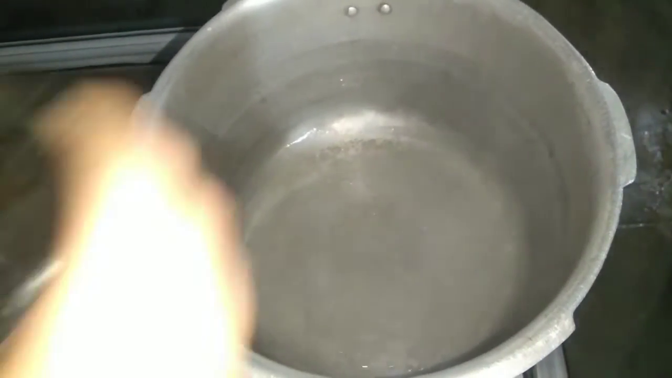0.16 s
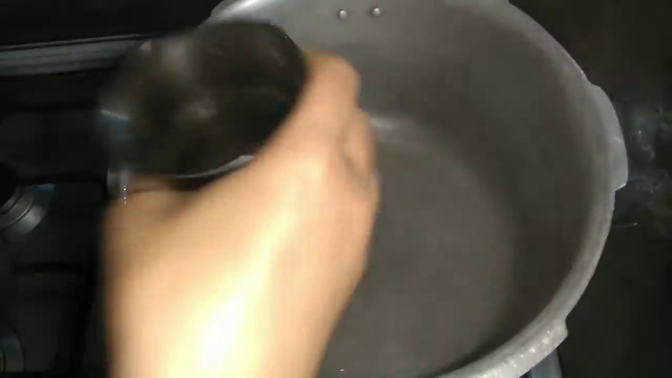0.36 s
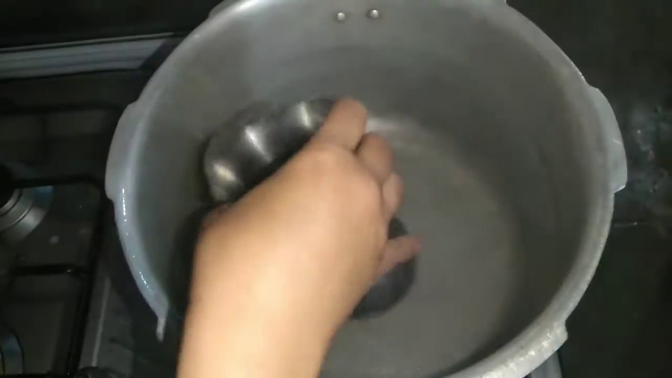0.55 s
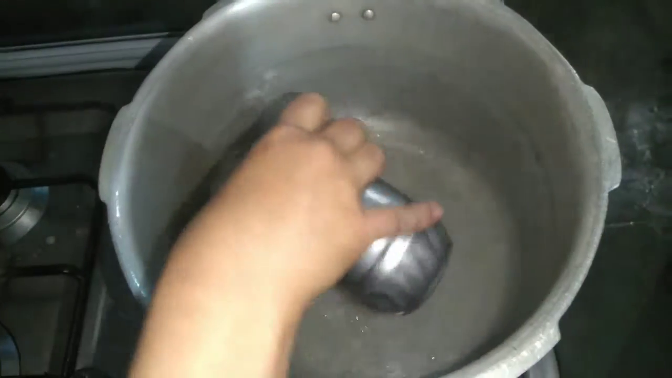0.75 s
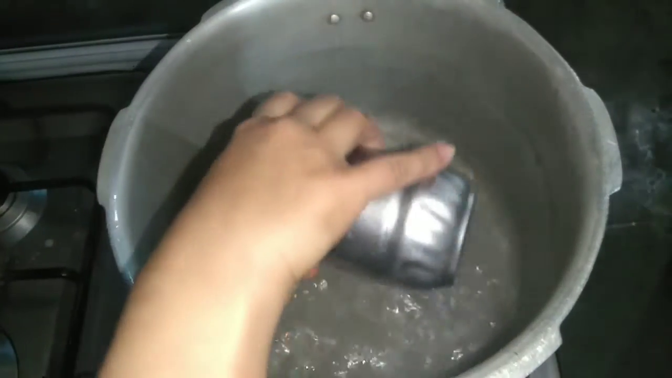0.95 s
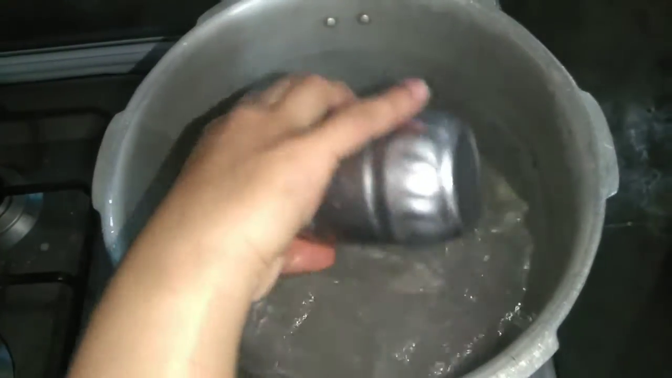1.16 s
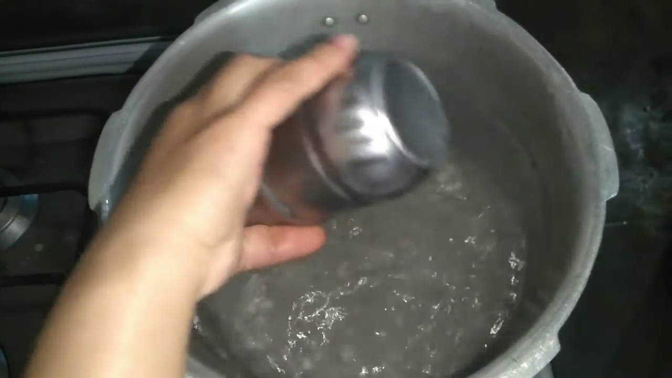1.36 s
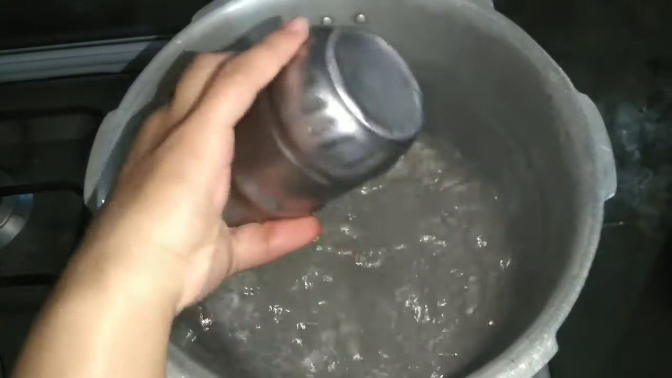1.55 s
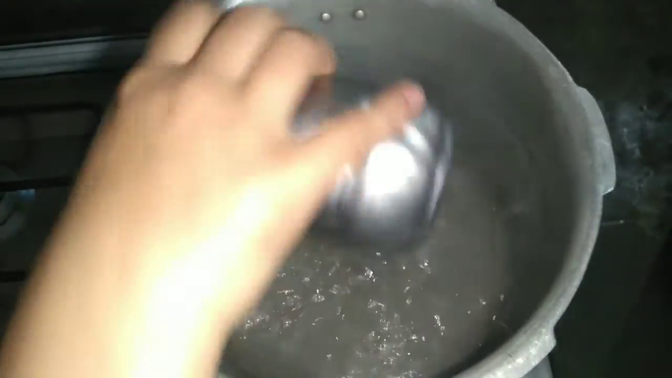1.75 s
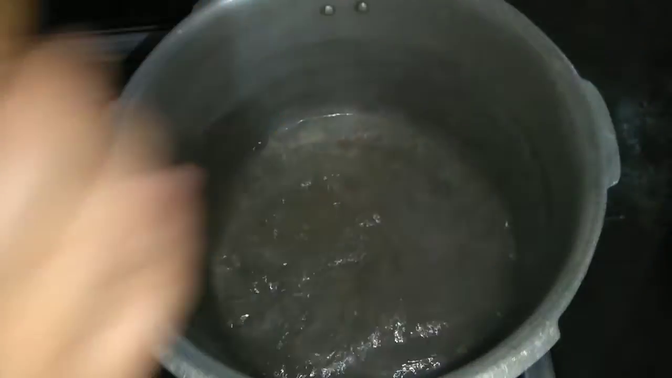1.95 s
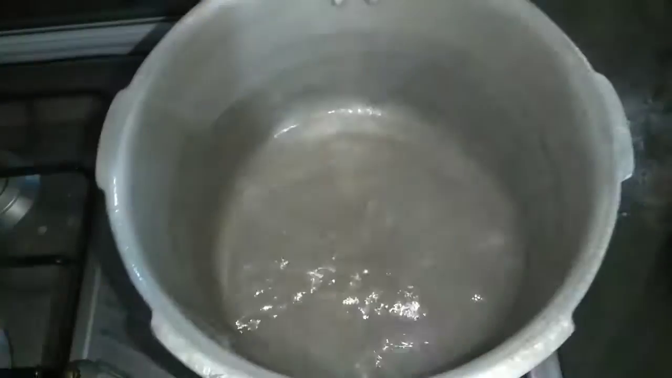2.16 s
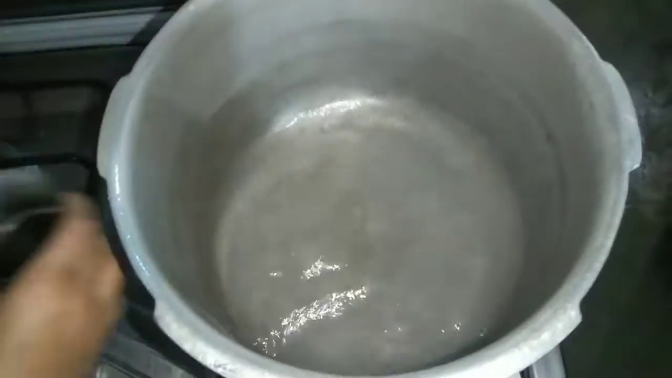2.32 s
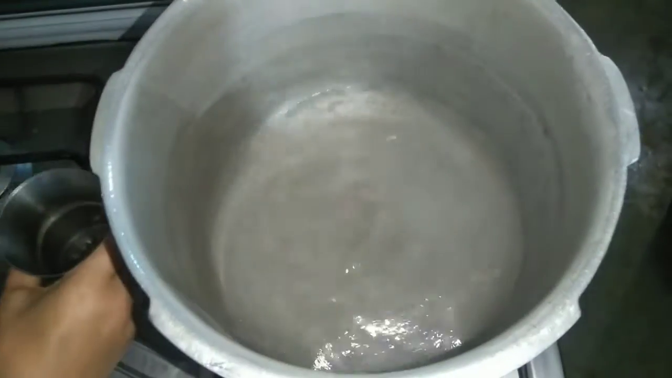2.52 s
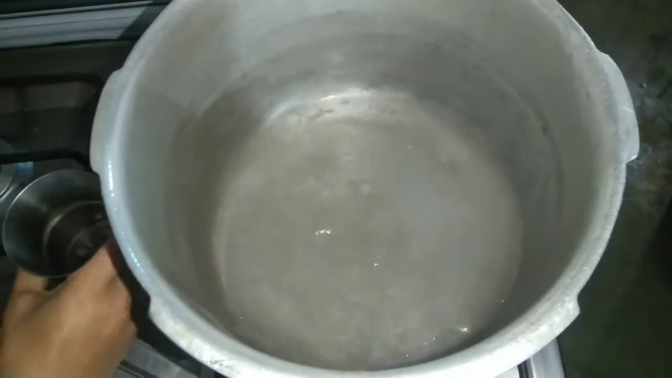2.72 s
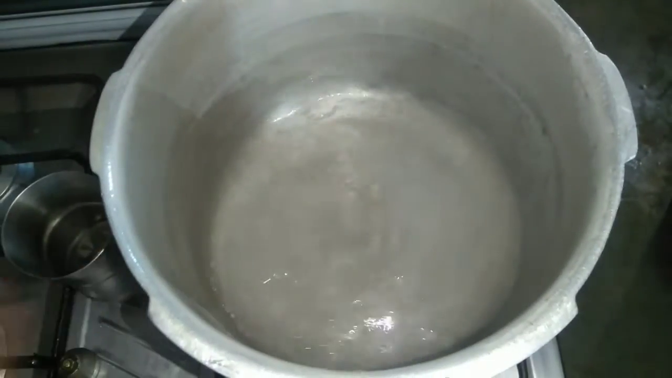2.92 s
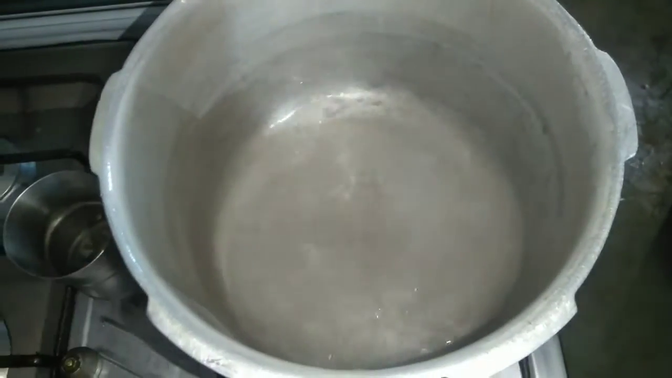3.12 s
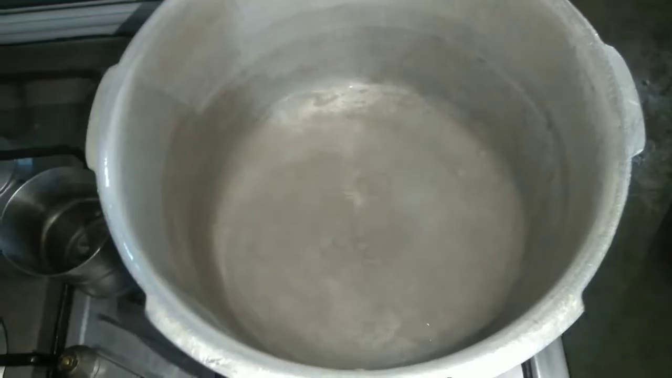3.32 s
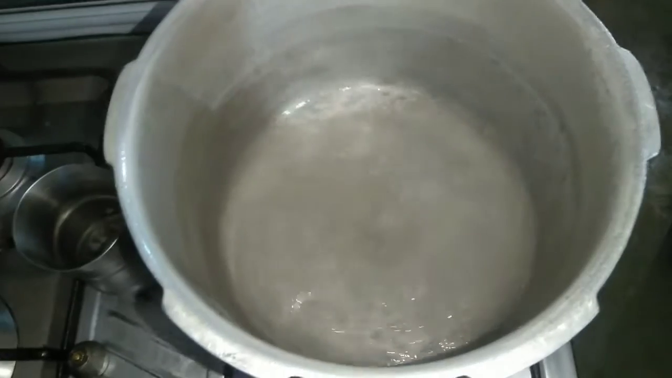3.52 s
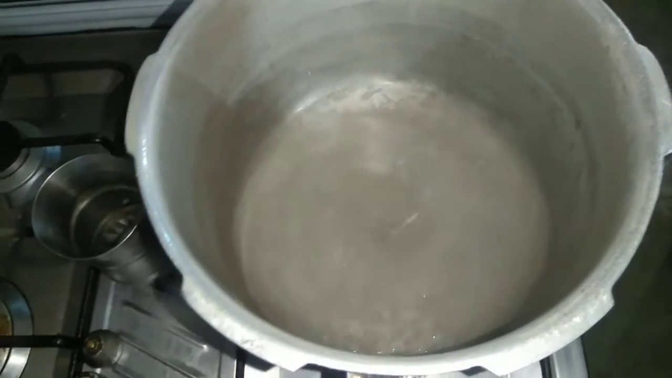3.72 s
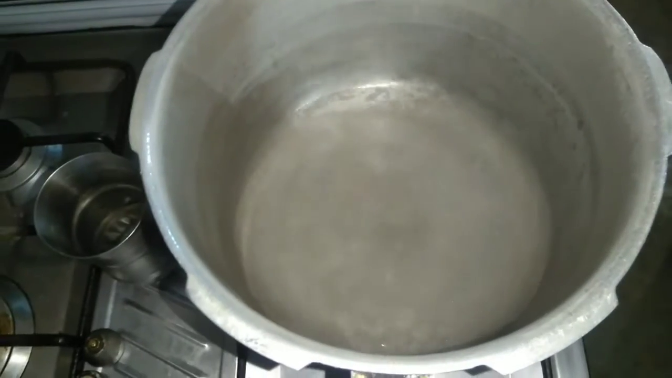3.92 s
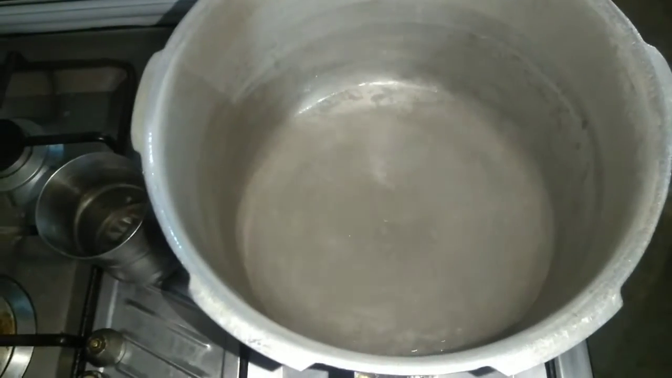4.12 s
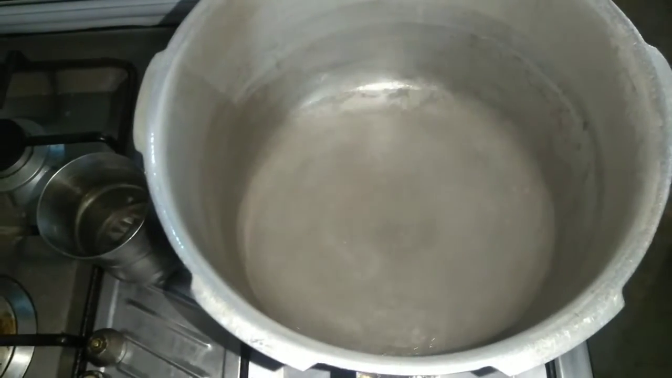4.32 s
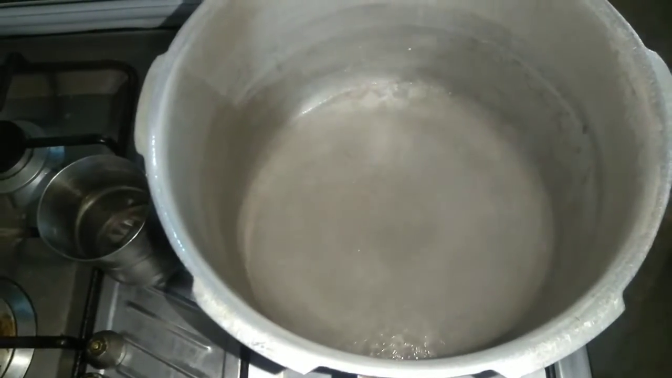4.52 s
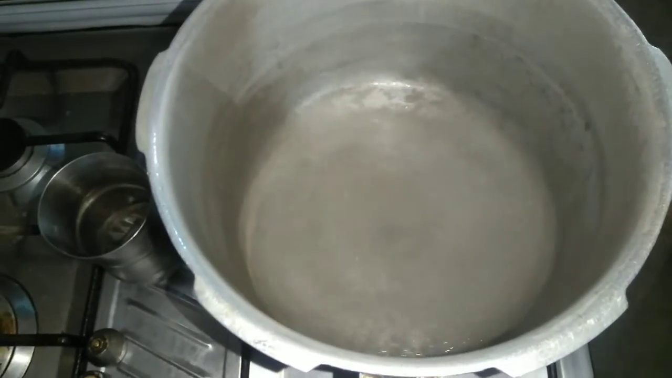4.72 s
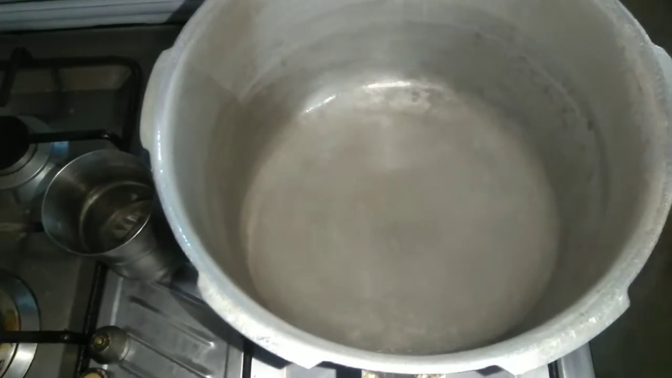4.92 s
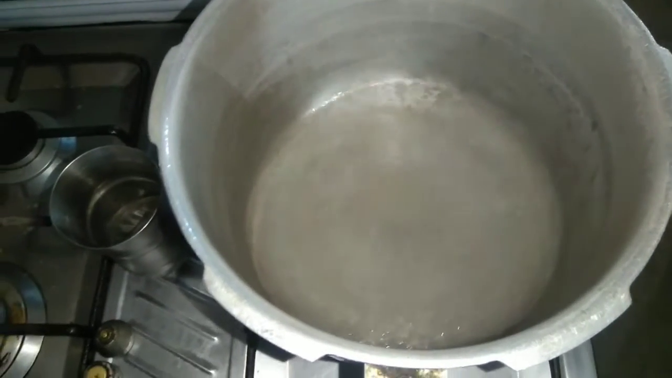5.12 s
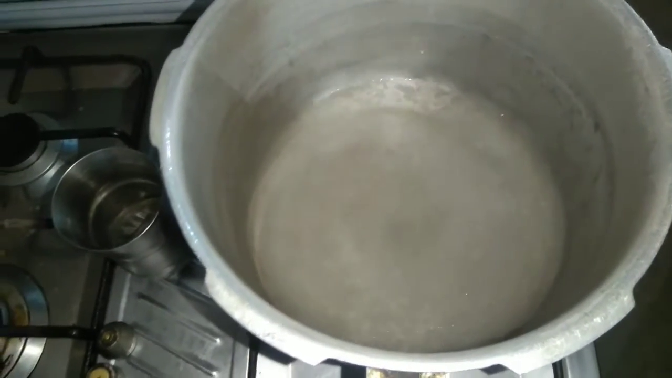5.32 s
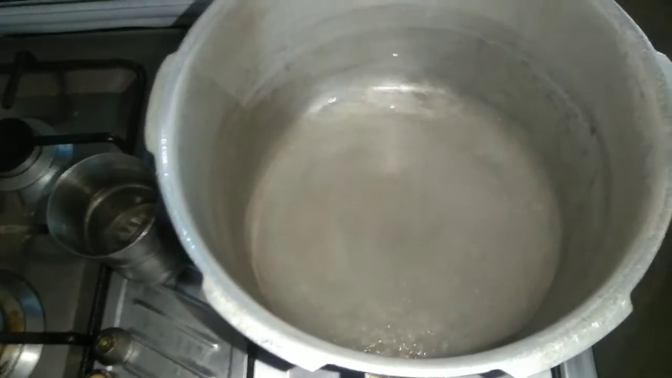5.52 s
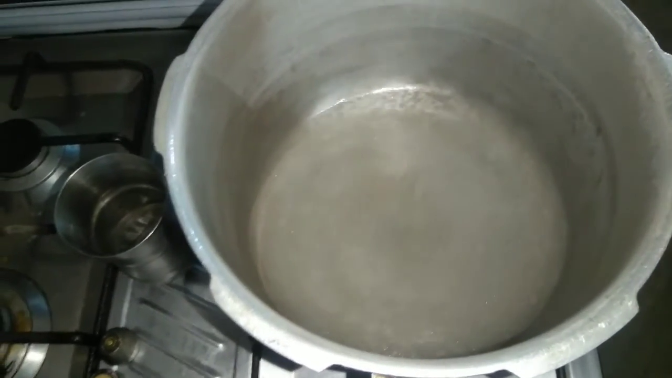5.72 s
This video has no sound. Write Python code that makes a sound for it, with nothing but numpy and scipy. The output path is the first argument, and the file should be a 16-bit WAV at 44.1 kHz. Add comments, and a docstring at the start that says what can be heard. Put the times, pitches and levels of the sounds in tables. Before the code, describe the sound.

A cup of water is splashed into a big metal pot, gurgles and fizzes out, then the cup thuds down and close knocks follow.

```python
"""On a kitchen stove, a steel cup of water is tipped into a big metal pot: splash, gurgle, then a dying fizz.
The water is made of thousands of ringing bubbles, with slaps and gulps, coloured by the pot.
The cup lands with a thud made of rebounding contacts, and filtered noise makes the stove shudder.
Knocks ring a hard case; rough noise makes scuffs and squeaks, and single clicks make bright ticks.
Room tone lies beneath, and a noise gate turns down the pauses."""
import sys
import numpy as np
from scipy import signal
from scipy.fft import rfft, irfft
from scipy.io import wavfile
from scipy.ndimage import uniform_filter1d, map_coordinates

SR = 44100
rng = np.random.default_rng(int(sys.argv[2]) if len(sys.argv) > 2 else 0)


def unload_audio(sound):
    """Save the sound as a 16-bit wav file, at the path given as the first command line argument."""
    columns = np.transpose(np.atleast_2d(sound))
    # keep every value between -1 and 1, then stretch to whole-number steps
    steps = np.round(np.clip(columns, -1, 1) * 32767)
    wavfile.write(sys.argv[1], SR, steps.astype(np.int16))


N = 254456
TIME = np.arange(N) / SR

# Vigour of the pour and of the foam it leaves. Each row: time in seconds, relative level in dB.
POUR_VIGOUR = [(0.68, -58), (0.702, -38.5), (0.725, -32.5), (0.967, -22), (1.114, -31), (1.164, -30.5),
               (1.226, -23.5), (1.302, -22), (1.43, -30), (1.82, -32.5), (1.914, -38.5), (2.356, -44.5),
               (2.5, -54.5), (2.628, -71), (2.66, -94)]
# Colour of the water. Each row: frequency in Hz, relative level in dB per Hz.
WATER_COLOUR = [(110, -36), (180, -9), (213, -9), (339, -25), (387, 0), (466, -14), (652, -14.5),
                (946, -10.5), (1160, -8), (2450, -4), (2690, -5.5), (3550, -4.5), (6570, -5.5), (11500, 2),
                (15500, -5.5)]
# Air and wall resonances of the pot. Each row: frequency in Hz, width in Hz, level in dB.
POT_RESONANCES = [(214, 25, -4.5), (391.8, 7.1, 5.5), (933, 56, 8), (1414, 120, -1.5), (2350, 500, -6),
                  (2980, 90, 1.5)]
# Bubble sizes, largest first. Each row: bubbles tried per second, lowest pitch in Hz, highest pitch in Hz,
# cycles rung, size spread in dB, share by which the pitch climbs, phase spread between channels in radians.
BUBBLE_SIZES = [(352, 170, 590, 38, 1.5, 0.13, 0.57), (380, 600, 1700, 24, 1.2, 0.15, 0.91),
                (1700, 1737, 4230, 85, .8, 0.15, 3.3), (2000, 4300, 7600, 70, 1.2, 0.06, 3.2),
                (3500, 7230, 15800, 50, 1.2, .03, 1.8)]
# How each bubble size answers the pour, largest first. Each row: dB at full vigour,
# share of the vigour's swing, late start in seconds, dB lost without the stream.
BUBBLE_RESPONSE = [(-44, 0.66, 0.05, 16.5), (-38, 0.3, 0.04, 28.5), (-28.5, 1.056, -0.043, 10.5),
                   (-28, 1.16, -.04, 2.5), (-23.5, 1, 0.0038, -0.5)]
# Bubbles bursting at the surface: one row with the same four columns, level relative.
BURST_RESPONSE = (-13.5, 0.6, 1.5, 4)
# The stream drumming the stove through the pot's base: one row with the same four columns.
DRUM_RESPONSE = (-52.5, 0.3, 0.12, 24)
# Sloshes that shed a cloud of bubbles around one pitch.
# Each row: crest in seconds, length in seconds, pitch in Hz, boost in dB.
SLOSH_CLOUDS = [(0.736, 0.041, 3000, -6), (1.053, 0.094, 444, 11.5), (1.667, 0.042, 432, 16.5),
                (1.748, 0.052, 2320, 7.5), (1.88, 0.091, 250, 6), (2.062, 0.11, 910, 15),
                (2.29, 0.13, 2810, 3), (2.37, 0.068, 815, 19.5)]
# Single big bubbles, and short spells of the pot ringing near 950 Hz. Each row: start in seconds, pitch in Hz,
# # relative level in dB, time to fall 60 dB in seconds, share by which the pitch climbs.
BIG_BUBBLES = [(0.699, 3650, -27.5, 0.077, 0.12), (0.723, 1926, -29, 0.07, .15),
               (0.75, 1613, -23, 0.074, 0.47), (0.755, 1435, -18, 0.055, .15),
               (0.787, 2044, -21.5, 0.078, 0.24), (0.803, 1295, -30, 0.056, 0.42),
               (0.826, 3030, -21, 0.037, 0.28), (0.841, 2480, -22, 0.028, 0.24),
               (0.868, 1230, -27.5, 0.028, .3), (0.913, 3560, -18, 0.059, 0.13),
               (0.947, 910, -23, 0.066, 0.1), (0.97, 950, -26, 0.054, .15), (0.994, 954, -25, 0.093, 0.15),
               (1.024, 915, -25, 0.055, .15), (1.014, 2030, -20, 0.092, 0.56),
               (1.061, 2340, -20, 0.061, 0.27), (1.103, 574, -24.5, 0.028, .2),
               (1.188, 2370, -22.5, 0.079, .2), (1.214, 957, -29, .1, 0.083),
               (1.255, 3290, -17.5, 0.03, 0.33), (1.288, 2230, -19.5, 0.073, 0.29),
               (1.31, 3260, -19, 0.071, .25), (1.343, 2410, -20.5, .06, 0.29),
               (1.409, 1400, -23, 0.066, 0.26), (1.441, 1700, -22, 0.053, .3),
               (1.459, 2010, -20.5, 0.04, 0.26), (1.523, 774, -19.5, 0.067, .22),
               (1.527, 890, -22, .035, .2), (1.529, 1951, -18, 0.032, 0.24),
               (1.53, 2400, -17.5, 0.043, 0.17), (1.578, 2820, -22, 0.037, 0.26),
               (1.585, 1450, -25, 0.06, .4), (1.617, 2000, -22.5, .048, 0.33),
               (1.656, 2400, -38, .04, 0.27), (1.69, 1620, -28, .035, .4), (1.696, 706, -31, 0.084, 0.31),
               (1.721, 2600, -31, 0.032, 0.35), (1.742, 2450, -33, 0.057, 0.22),
               (1.76, 3830, -19, .05, 0.16)]
# Lumps of water slapping the pot. Each row: start in seconds, relative level in dB, lowest Hz, contact Hz,
# left-right difference in dB, resonance in Hz, chatter in dB against the first contact.
WATER_SLAPS = [(0.699, -10, 2780, 5000, -3, 3010, 8), (0.7275, 6, 3517, 3926, 4.5, 3840, 2),
               (0.757, 1.5, 1430, 2200, 6, 1550, 4), (1.533, -9, 1200, 2574, 3.5, 2400, 14)]
# Water lapping the wall. Each row: start in seconds, length in seconds, pitch in Hz,
# roughness cutoff in Hz, level in dB.
WATER_LAPS = [(1.839, 0.12, 214, 25.3, -56), (2.019, 0.15, 384, 69, -58.5), (2.349, 0.11, 221, 33.5, -54.5)]
# The cup landing and rocking. Each row has the same seven columns as the slaps.
CUP_LANDINGS = [(2.6995, 5.5, 110, 480, 1, 239, -2.5), (2.702, -1.5, 460.3, 12000, 9.5, 990, 20),
                (2.719, 1.5, 99, 450, -1.5, 170, 3), (2.716, -5, 499, 6000, -15, 884, 27),
                (2.7285, 0, 139.7, 600, -2, 340, -1), (2.74, -6, 70, 2800, 11.5, 305, 2),
                (2.761, -9, 60.3, 1205, -7, 510, 5), (2.777, -16.5, 300, 2500, 16, 1395, 11),
                (2.801, -16.5, 120, 1110, -2, 297, 8), (2.873, -8.5, 181, 330, 4, 246, -4),
                (2.885, -13.5, 257, 654, 7, 420, -4), (2.984, -30, 121.5, 717, -12, 386, 11),
                (3.234, -29, 450, 2460, 2, 790, 2)]
# Colour of a thud. Each row: frequency in Hz, relative level in dB per Hz.
THUD_COLOUR = [(29, -26.5), (55, -15), (105, -23), (165, -0.5), (220, -2.5), (320, -8.5), (460, -12),
               (650, -15), (900, -16.5), (1880, -20.5), (2600, -19.5), (4500, -23), (9000, -20.5),
               (15500, -17.5)]
# Ringing of the stove top. Each row: frequency in Hz, relative level in dB,
# time to fall 60 dB in seconds before damping caps it.
STOVE_TOP_MODES = [(170, -4, 0.14), (232, 4.5, 0.072), (388.5, -6, 0.19), (623, -16, 0.18),
                   (850, -18, 0.22), (969, -15.5, 0.29), (1513, -14.5, 0.18), (1588, -19.5, 0.3),
                   (1770, -12.5, 0.14), (2330, -13.5, 0.28), (2550, -13.5, 0.25), (3521, -26, 0.2)]
# Lowest modes of the stove. Each row: frequency in Hz, width in Hz, relative level in dB.
STOVE_MODES = [(65, 2.7, -3), (94.1, 4.8, -9.5), (222, 7.5, -34)]
# Jolts that shake the stove. Each row: start in seconds, length in seconds, level in dB before it sags.
STOVE_JOLTS = [(1.042, 0.033, -41), (2.685, 0.53, -32), (3.229, 0.12, -42), (3.466, 0.11, -56.5),
               (3.632, 0.066, -68.5)]
# Handling knocks. Each row has the same seven columns as the slaps.
CASE_KNOCKS = [(3.657, -46, 151, 9070, 8.5, 703, 11.5), (4.468, -17, 149, 8920, 8, 3490, 3),
               (4.475, -21.5, 900, 4030, 7, 2240, 5.5), (4.4995, -4.5, 300, 1700, 5.5, 1600, -6),
               (4.509, -18, 500, 1700, 0, 1150, -3), (4.5223, -1, 450, 1220, -3, 1120, -9),
               (4.528, -3, 60, 645, -2, 353, -8), (4.539, -5, 150, 850, 4.5, 455, -15),
               (4.7275, 3.5, 205, 13700, 2.5, 3300, -2), (4.7282, 1.5, 2600, 4550, 3, 3690, -4),
               (4.7351, -7, 300, 7920, 19, 1420, 1.5), (4.746, -6.5, 250, 4980, -1, 595, 7),
               (4.762, -13.5, 200, 3500, 0.5, 2200, 2), (4.777, -11, 200, 2600, 9.5, 643, 10),
               (4.789, -23, 200, 2600, 9, 450, 7), (4.812, -17, 300, 892, -7, 720, -9),
               (4.831, -19, 300, 900, -2, 650, -1), (4.902, -30, 200, 890, 4, 500, 2.5),
               (5.006, -20, 150, 600, 2, 620, 1), (5.029, -5.5, 90, 400, -1, 198.7, -1.5),
               (5.0435, -19.5, 90, 6000, 17.5, 1470, 6), (5.06, -21, 200, 2970, -4, 740, -6),
               (5.097, -16, 700, 5000, 4.5, 2670, 1), (5.101, -14, 700, 2720, 17, 1500, -3),
               (5.122, -28, 250, 2200, 2.5, 898, 2), (5.277, -34, 300, 2500, 0.5, 1500, -1),
               (5.3028, 0.5, 241, 520, 1, 437.5, -16.5), (5.308, -15.5, 300, 1290, 4, 1300, -4),
               (5.316, -13.5, 350, 900, 6, 577, -2.5), (5.3712, 3.5, 200, 1038, 0.5, 450, -18.5),
               (5.376, -15.5, 350, 2000, 11.5, 1058, -7), (5.387, -19, 400, 1000, 5.5, 719, -4),
               (5.422, -13, 350, 1375, 11, 649, 8.5), (5.711, -10, 35, 60, -15.5, 62, -22),
               (5.7366, -8.5, 913, 12000, 7, 4070, 9.5), (5.7438, -14, 800, 1980, -9.5, 1400, -5)]
# Colour of a knock. Each row: frequency in Hz, relative level in dB per Hz.
KNOCK_COLOUR = [(50, -10.5), (110, -4.5), (170, 3), (280, -10), (450, 3), (880, 0.5), (1700, 2), (2800, -1),
                (3700, -10), (4800, -12), (7500, -7.5), (11000, -9.5), (15500, -26)]
# Ringing of the knocked case. Each row: frequency in Hz, relative level in dB,
# time to fall 60 dB in seconds before damping caps it.
CASE_MODES = [(411.2, -5, 0.17), (450, 1, 0.058), (617.6, -4.5, 0.14), (877, -3, 0.17), (1470, -1.5, 0.044),
              (1700, -3, .042), (2067, -7, .05), (2600, -5, .07), (3215, -11, 0.091), (3800, -8, .05)]
# A hand brushing by. Each row: start in seconds, length in seconds,
# relative level of the hiss in dB, relative level of the drag on the case in dB.
HAND_BRUSHES = [(0.018, 0.11, -61.5, -63.5), (0.114, 0.098, -47, -66.5), (0.314, 0.17, -83, -61),
                (0.358, 0.047, -71, -63), (0.455, 0.096, -39, -64), (0.575, 0.078, -54, -62.5),
                (2.977, 0.13, -58, -48.5), (3.033, 0.031, -68, -45.5), (3.226, 0.065, -66, -49),
                (3.288, 0.11, -67, -65.5), (3.486, 0.085, -83.5, -73), (3.648, 0.061, -49, -53.5),
                (3.958, 0.032, -81.5, -62.5), (4.462, 0.088, -46.5, -40.5), (4.573, 0.11, -36, -45),
                (4.862, 0.03, -90, -57), (4.99, 0.066, -85, -46.5), (5.039, 0.02, -40, -30.5),
                (5.06, 0.085, -53.5, -38), (5.198, 0.11, -66, -45), (5.436, 0.067, -76, -52)]
# Colour of the brushing hiss. Each row: frequency in Hz, relative level in dB per Hz.
BRUSH_COLOUR = [(120, -32.5), (200, -11), (534, -20.5), (607, -31), (890, -10), (1210, -7.5), (2380, -0.5),
                (6240, 0.5), (10200, 4), (15500, 4)]
# Faint squeaks and scrapes. Each row: start in seconds, length in seconds, pitch in Hz,
# relative level in dB, roughness cutoff in Hz, share by which the pitch falls.
GRIP_SQUEAKS = [(2.472, 0.21, 2948, -62.5, 800, 0.18), (2.874, 0.16, 2950, -63, 503, .1),
                (2.967, 0.13, 3170, -59, 750, 0.154), (3.045, 0.046, 2750, -53.5, 640, 0.13),
                (3.088, .16, 2600, -65.5, 420, 0.17), (3.281, 0.11, 2896, -68.5, 420, 0.21),
                (3.358, 0.018, 2640, -61, 420, .1), (3.389, 0.081, 2470, -71.5, 420, 0.18),
                (3.5, 0.085, 2037, -81.5, 416, 0.21), (3.823, 0.097, 3217, -61, 400, 0.2),
                (3.908, 0.049, 2668, -66, 250, 0.11), (3.94, .068, 2400, -57.5, 383, 0.219),
                (4.203, 0.067, 2890, -62, 300, .16), (4.277, 0.058, 2650, -60.5, 280, .25),
                (4.322, 0.029, 2480, -60, 330, 0.17), (4.85, 0.038, 3800, -65, 160, 0.026),
                (5.433, 0.096, 3350, -63, 198.7, .02)]
# Tiny bright ticks as the cup is brought over. Each row: time in seconds, relative level in dB.
BRIGHT_TICKS = [(0.047, -36), (0.319, -29.5), (0.33, -26), (0.384, -33)]
# Colour of the room tone. Each row: frequency in Hz, relative level in dB per Hz.
ROOM_TONE_COLOUR = [(24, -46.5), (40, 3), (1100, -16), (1600, -3), (1960, -6.5), (4570, -16.5), (5440, -23),
                    (15500, -17)]
# How alike the echoes are left and right. Each row: frequency in Hz, correlation.
ECHO_LIKENESS = [(100, 0.96), (250, 1), (500, 0.75), (1000, 1), (2000, 0.17), (4000, 0.29), (15000, 0.65)]
# Dying of the echoes. Each row: frequency in Hz, time to fall 60 dB in seconds.
ECHO_T60 = [(100, 0.45), (400, 0.16), (2000, 0.21), (6000, 0.23), (15000, 0.31)]

STREAM_START_S, STREAM_END_S = 0.693, 1.677   # the falling stream drives air deep into the water
DIG_S, SETTLE_S = 0.021, 0.28   # time for bubbles to build up, and to die out after the stream
FIRST_BUBBLE_HZ, DEEPEN_S_PER_OCTAVE = 2400, 0.041   # ever lower bubbles appear as the stream digs in
TRICKLE_DB, TRICKLE_PER_S = 1.3, 22   # uneven spurts
SLOSH_OCTAVES = 0.46   # spread of a cloud's pitches
BURSTS_PER_S, BURST_SPREAD_DB = 70, 3.5
JOLT_ATTACK_S, JOLT_SAG_DB_PER_S, JOLT_RELEASE_DB_PER_S = 0.057, 32, 331.5
CASE_RING_DB, REBOUNDS_PER_S = -8, 650
HISS_DULL_HZ, DRAG_DULL_HZ = 12000, 1491   # treble limits of the hand's hiss and drag
SLIDE_AFTER_S, SLIDE_S, SLIDE_DB, SLIDE_DULL_HZ = 0.02, 0.061, -36, 3940   # the case slides after a knock
FLOOR_DB = -69
CUTOFF_HZ = 15700


def pour(patchy_db=1.5):
    """Big bubbles gurgle, small ones splash, the finest fizz; the pot colours them all."""
    space = kitchen(wet_db=-3, early_db=10, early_s=.04, lag_ms=.05)
    out = 0
    for size_row, response in zip(BUBBLE_SIZES, BUBBLE_RESPONSE):
        per_s, low_hz, high_hz, cycles, spread_db, rise, apart = size_row
        level_db = stirred(*response) + sloshing(np.sqrt(low_hz * high_hz))
        gain = from_db(level_db + TRICKLE_DB * drift(TRICKLE_PER_S))
        grains = bubbles(per_s, low_hz, high_hz, cycles, spread_db, rise, patchy_db, apart)
        in_pot = grains + sum(from_db(db) * resonance(grains, hz, width) for hz, width, db in POT_RESONANCES)
        heard = convolve(in_pot, space)
        # even out the loudness, so that the gain alone shapes it
        power = np.abs(uniform_filter1d(heard.mean(0) ** 2, size=4000))
        out = out + gain * heard / np.sqrt(power + power.mean() / 100)
    # only short waves bounce off something as small as the cup
    bass = signal.sosfiltfilt(signal.butter(2, 1600, fs=SR, output="sos"), out)
    return bass + from_db(0.5) * off_the_cup(out - bass)


def bubbles(per_s, low_hz, high_hz, cycles, spread_db, rise, patchy_db, apart):
    """Bubbles born at random; each has its own size and place, and its pitch climbs as it rings."""
    start, end = POUR_VIGOUR[0][0], POUR_VIGOUR[-1][0]
    clouds = rng.standard_normal((40, 200))
    count = int(per_s * (end - start))
    when, pitch, size, place, sign = rng.random((count, 5)).T[:, :, None]
    s = start + when * (end - start)
    hz = low_hz * (high_hz / low_hz) ** pitch
    # bubbles of like size come in short-lived clouds
    cloud = map_coordinates(clouds, [4 * np.log2(hz / 100), 30 * s], order=1, mode="nearest")
    level_db = at_hz(WATER_COLOUR, hz) - spread_db * np.log(size + 0.085) + patchy_db * cloud
    strength = hz * from_db(level_db) * np.sign(sign - .5)
    # lower bubbles have to wait until the stream has dug in
    first_s = STREAM_START_S + DEEPEN_S_PER_OCTAVE * np.log2(FIRST_BUBBLE_HZ / hz)
    strength = strength * (s > first_s)
    # age runs from 0 at birth to 1 when the ring has died; small bubbles die sooner
    steps = np.arange(int(cycles / low_hz * SR))
    age = steps / SR * hz / cycles
    phase = 2 * np.pi * cycles * (age + rise * np.minimum(age, 1) ** 2 / 2)
    fade = strength * from_db(-60 * age) * (1 - np.exp(-2 * cycles * age))
    at = ((s * SR).astype(int) + steps).ravel()
    channels = []
    for side in (1, -1):
        ringing = fade * np.sin(phase + side * apart * (place - .5))
        channels.append(np.bincount(at, ringing.ravel(), N)[:N])
    return np.array(channels)


def stirred(full_db, follows, late_s, lost_db):
    """Level in dB of something the pour drives: it follows the vigour, and drops when no stream is falling."""
    s, db = np.transpose(POUR_VIGOUR)
    vigour_db = np.interp(TIME, s, db - db.max(), left=-200, right=-200)
    building = np.clip((TIME - STREAM_START_S - late_s) / DIG_S, 0, 1)
    settling = np.clip(1 - (TIME - STREAM_END_S) / SETTLE_S, 0, 1)
    return full_db + follows * vigour_db - lost_db * (1 - building * settling)


def sloshing(hz):
    """Boost in dB that the sloshes give to bubbles near a pitch."""
    boost_db = 0
    for s, length, pitch_hz, db in SLOSH_CLOUDS:
        octaves = np.log2(hz / pitch_hz)
        boost_db = boost_db + db * np.exp(-(2 * (TIME - s) / length) ** 2 - (octaves / SLOSH_OCTAVES) ** 2 / 2)
    return boost_db


def off_the_cup(x, echo=0.39, delay_ms=1.3, sway_ms=.33):
    """A reflection off the moving cup and hand sweeps soft notches, differently in each channel."""
    moving = drift(6.0)
    out = []
    for channel in x:
        lag_s = (delay_ms + sway_ms * (moving + drift(3))) / 1000
        out.append(map_coordinates(channel, [(TIME - lag_s) * SR], order=3))
    return x + echo * np.array(out)


def plops(attack_s=.004):
    """Single bubbles ring and climb in pitch as they near the surface; a few rings near 950 Hz are the pot's
    own."""
    out, t = np.zeros(N), TIME[:SR // 4]
    for s, hz, db, t60, rise in BIG_BUBBLES:
        phase = 2 * np.pi * np.cumsum(hz * (1 + rise * np.minimum(t / t60, 1))) / SR
        add(out, s, from_db(db - 60 * t / t60) * np.sin(phase) * (1 - np.exp(-t / attack_s)))
    return convolve(out, kitchen(wet_db=-9, early_db=4, early_s=0.02, lag_ms=.1))


def splats():
    """Lumps of water strike the pot in runs of tiny contacts: wet slaps that stand out of the rush."""
    space = kitchen(wet_db=-3, early_db=5, early_s=.02, lag_ms=.03)
    slaps = blows(WATER_SLAPS, impulse(WATER_COLOUR), space, chatter_s=0.011, ring_db=0.5, ring_q=6)
    return from_db(4.0) * slaps


def bursts():
    """Bubbles burst at the surface: lone bright pricks that stand out of the fading fizz."""
    out, t = np.zeros(N), TIME[:SR // 50]
    start, end = POUR_VIGOUR[0][0], POUR_VIGOUR[-1][0]
    for when, pitch, size in rng.random((int(BURSTS_PER_S * (end - start)), 3)):
        hz = 5000 * 3 ** pitch
        ping = np.sin(2 * np.pi * hz * t) * from_db(-60 * t * hz / 25)   # rings for 25 cycles
        strength = from_db(-BURST_SPREAD_DB * np.log(size + .05) - 10) * np.sqrt(hz / 8000)
        add(out, start + when * (end - start), strength * ping)
    space = kitchen(wet_db=-4, early_db=6, early_s=.02, lag_ms=.05)
    return convolve(out * from_db(stirred(*BURST_RESPONSE)), space)


def laps(rise=0.097):
    """The settling water rocks and laps the wall: faint, dull gulps of rough tone that bend upward."""
    out = np.zeros(N)
    for s, length, hz, width_hz, db in WATER_LAPS:
        add(out, s, from_db(db) * hoarse(stroke(length, grit_db=-0.5), hz, width_hz, rise))
    return out


def thuds():
    """The cup's weight lands on the stove top, whose sheet booms briefly."""
    body = struck(THUD_COLOUR, STOVE_TOP_MODES, ring_db=-10, longest_s=.22)
    space = kitchen(wet_db=-8, early_db=1, early_s=.06, lag_ms=.03)
    heard = blows(CUP_LANDINGS, body, space, chatter_s=.09, ring_db=-5, ring_q=2)
    return from_db(8.0) * heard


def shudder(waver=0.088):
    """The loaded stove shakes in its lowest modes, driven by the pour and by jolts."""
    shake = 0
    for hz, width, db in STOVE_MODES:
        shake = shake + from_db(db) * resonance(rng.standard_normal(N), hz, width) / np.sqrt(width)
    shake = rms_one(shake)
    shake = rms_one(signal.sosfilt(signal.butter(4, 55, "high", fs=SR, output="sos"), shake))
    # flatten most of the noise's own swelling
    swell = np.sqrt(uniform_filter1d(shake ** 2, size=4000) + waver ** 2)
    return (from_db(stirred(*DRUM_RESPONSE)) + jolted()) * rms_one(shake / swell)


def jolted():
    """Each jolt swells quickly, sags for its length, then is damped."""
    out = np.zeros(N)
    for s, length, db in STOVE_JOLTS:
        age = np.maximum(TIME - s, 0)
        damped_db = JOLT_RELEASE_DB_PER_S * np.maximum(age - length, 0)
        out += np.minimum(age / JOLT_ATTACK_S, 1) * from_db(db - JOLT_SAG_DB_PER_S * age - damped_db)
    return out


def knocks():
    """A hard case is bumped and dragged close to the microphone: dry cracks, rebounds and gritty scrapes."""
    body = struck(KNOCK_COLOUR, CASE_MODES, CASE_RING_DB, longest_s=.12)
    space = kitchen(wet_db=-5, early_db=-1, early_s=.04, lag_ms=.27)
    bumps = blows(CASE_KNOCKS, body, space, chatter_s=.026, ring_db=2, ring_q=5)
    scrapes = convolve(convolve(drags(grit_db=12), body), space)
    return from_db(3.0) * bumps + from_db(-15.0) * scrapes


def drags(grit_db):
    """Friction on the case: under each brush of the hand, and as a short slide after each knock."""
    out = np.zeros(N)
    for s, length, _, db in HAND_BRUSHES:
        add(out, s, from_db(db) * rms_one(lowpass(stroke(length, grit_db), DRAG_DULL_HZ)))
    for s, db, _, contact_hz, *_ in CASE_KNOCKS:
        slide = rms_one(lowpass(stroke(SLIDE_S, grit_db), SLIDE_DULL_HZ))
        add(out, s + SLIDE_AFTER_S, from_db(db + SLIDE_DB) * lowpass(slide, contact_hz))
    return out


def scuffs(flutter_db=2):
    """Skin and cloth brush past unevenly: hissing friction that flutters in level."""
    out = np.zeros(N)
    for s, length, db, _ in HAND_BRUSHES:
        add(out, s, from_db(db) * rms_one(lowpass(stroke(length, grit_db=6.5), HISS_DULL_HZ)))
    out = out * from_db(flutter_db * drift(150))
    space = kitchen(wet_db=6.5, early_db=15.5, early_s=.04, lag_ms=.1)
    heard = convolve(convolve(out, impulse(BRUSH_COLOUR)), space)
    return from_db(-8.5) * heard * from_db([[1.5], [-1.5]])   # a little to the left


def squeaks(rub_db=-12):
    """Short hoarse slips of a grip, each stuttering and sliding down in pitch over a dull rub."""
    out = np.zeros(N)
    for s, length, hz, db, width_hz, fall in GRIP_SQUEAKS:
        slips = stroke(length, grit_db=6)
        squeal = hoarse(slips, hz, width_hz, glide=-fall)
        rub = from_db(rub_db) * rms_one(lowpass(slips, 2500))
        add(out, s, from_db(db) * (squeal + rub))
    out = out * from_db(3 * drift(90) - 1)
    space = kitchen(wet_db=-1.0, early_db=3.5, early_s=0.04, lag_ms=.05)
    return convolve(out, space) * from_db([[2], [-2]])   # a little to the left


def ticks(centre_hz=13000, width_hz=3500):
    """Pinpoint clicks high in the treble."""
    clicks = np.zeros(N)
    for s, db in BRIGHT_TICKS:
        clicks[round(s * SR)] = from_db(db + 2.0)
    space = kitchen(wet_db=-16.0, early_db=33, early_s=0.011, lag_ms=.1)
    return convolve(resonance(clicks, centre_hz, width_hz), space)


def room_tone():
    """Steady coloured noise, separate in each channel."""
    return from_db(FLOOR_DB) * rms_one(convolve(rng.standard_normal((2, N)), impulse(ROOM_TONE_COLOUR)))


def blows(rows, body, space, chatter_s, ring_db, ring_q):
    """Each blow rebounds in a dying run of tiny contacts and stirs a brief resonance where it lands."""
    out, t = np.zeros((2, N)), TIME[:SR // 10]
    for s, db, lowest_hz, contact_hz, pan_db, ring_hz, chatter_db in rows:
        gaps, sizes = rng.random((2, 40))
        at = (np.cumsum(.3 + 1.4 * gaps) * SR / REBOUNDS_PER_S).astype(int)
        rebounds = np.sign(sizes - .5) * (.5 + np.abs(sizes - .5))
        chatter = np.bincount(at, rebounds, len(t))[:len(t)] * from_db(-60 * t / chatter_s)
        contact = from_db(chatter_db) * chatter / np.linalg.norm(chatter) + (t == 0)
        blow = signal.fftconvolve(body, contact / np.linalg.norm(contact))
        # a soft blow lacks treble, a light one bass
        blow = highpass(lowpass(blow, contact_hz), lowest_hz)
        blow = blow + from_db(ring_db) * resonance(blow, ring_hz, ring_hz / ring_q)
        add(out, s, blow * from_db(db + np.array([[.5], [-.5]]) * pan_db))
    return convolve(out, space)


def struck(spectrum, modes, ring_db, longest_s):
    """Response of a body: a short crack and its ringing modes, damped by the hand."""
    t = TIME[:SR // 3]
    ringing = 0
    for hz, db, t60 in modes:
        ringing = ringing + from_db(db - 60 * t / min(t60, longest_s)) * np.sin(2 * np.pi * hz * t)
    body = from_db(ring_db) * ringing / np.linalg.norm(ringing)
    add(body, 0, impulse(spectrum))
    return body


def stroke(length, grit_db):
    """Friction: uneven tiny slips under a stroke that rises fast and eases off."""
    u = np.linspace(0, 1, max(8, round(length * SR)))
    slips = rng.standard_normal((SR // 2, 2))[:len(u)]
    uneven = from_db(grit_db * np.minimum(slips[:, 1], 2))
    return rms_one(slips[:, 0] * uneven * np.sin(np.pi * u ** 0.54))


def hoarse(slips, hz, width_hz, glide):
    """A rough tone: slips within a band whose centre glides by a share of its pitch."""
    pitch = hz * (1 + glide * np.linspace(-.5, .5, len(slips)))
    return rms_one(lowpass(slips, width_hz) * np.sin(2 * np.pi * np.cumsum(pitch) / SR))


def kitchen(wet_db, early_db, early_s, lag_ms):
    """Stereo response: the direct sound, a flurry of near reflections, and a tail dying band by band."""
    t, tail = TIME[:SR // 2], 0
    edges = np.geomspace(40, 18000, 19)
    for low, high in zip(edges, edges[1:]):
        band_filter = signal.butter(2, [low, high], "band", fs=SR, output="sos")
        mid, side = signal.sosfilt(band_filter, rng.standard_normal((2, len(t))))
        hz = np.sqrt(low * high)
        alike = np.clip(at_hz(ECHO_LIKENESS, hz), -1, 1)
        fade = from_db(-60 * t / at_hz(ECHO_T60, hz)) + from_db(early_db - 60 * t / early_s)
        band = (np.sqrt(1 + alike) * mid + np.sqrt(1 - alike) * side * [[1], [-1]]) * fade
        tail = tail + band * np.sqrt(4 * (high - low) / SR / np.sum(band ** 2))
    response = from_db(wet_db) * tail
    response[0, round(abs(lag_ms) * SR / 1000)] += 1   # the left channel hears it later
    response[1, 0] += 1
    return response


def drift(rate):
    """Slow chance of spread 1, renewed rate times a second."""
    return np.interp(TIME * rate, np.arange(4000), rng.standard_normal(4000))


def impulse(spectrum, size=4096):
    """The shortest causal pulse of a given colour, with energy 1."""
    cepstrum = irfft(np.log(from_db(at_hz(spectrum, np.fft.rfftfreq(size, 1 / SR)))))
    pulse = irfft(np.exp(rfft(2 * cepstrum[:size // 2], size)))
    return pulse / np.linalg.norm(pulse)


def resonance(x, hz, width):
    """Band-pass with gain 1 on top."""
    r = np.exp(-np.pi * width / SR)
    forward = np.array([1, 0, -1]) * (1 - r * r) / 2
    feedback = [1, -2 * r * np.cos(2 * np.pi * hz / SR), r * r]
    return signal.lfilter(forward, feedback, x + 1e-18)


def lowpass(x, hz):
    """Two-pole low-pass."""
    return signal.sosfilt(signal.butter(2, min(hz, .45 * SR), fs=SR, output="sos"), x + 1e-18)


def highpass(x, hz):
    """Two-pole high-pass."""
    return signal.sosfilt(signal.butter(2, hz, "high", fs=SR, output="sos"), x + 1e-18)


def convolve(x, response):
    """Pass a sound through a response."""
    return signal.fftconvolve(np.atleast_2d(x), np.atleast_2d(response), axes=1)[:, :N]


def add(out, s, sound):
    """Mix a sound in at time s."""
    room_left = out[..., max(0, round(s * SR)):][..., :sound.shape[-1]]
    room_left += sound[..., :room_left.shape[-1]]


def from_db(db):
    """Decibels to gain."""
    return 10 ** (np.asarray(db) / 20)


def rms_one(x):
    """Scale so that the mean of the channels has rms 1."""
    return x / np.sqrt(np.mean(np.atleast_2d(x).mean(0) ** 2) + 1e-20)


def at_hz(points, hz):
    """Read a table on a log-frequency axis."""
    points = np.array(points)
    return np.interp(np.log(hz + 1e-9), np.log(points[:, 0]), points[:, 1])


def scene():
    """All sources over the room tone."""
    water = pour() + plops() + splats() + bursts() + laps()
    stove = thuds() + shudder()
    handling = knocks() + scuffs() + squeaks() + ticks()
    return water + stove + handling + room_tone()


def record(dry, gate_db=-58, depth_db=16, slope=2.36):
    """A noise gate turns down whatever falls under its threshold; peaks are rounded and the top is cut."""
    power = np.abs(uniform_filter1d(np.mean(dry ** 2, axis=0), size=600))
    level_db = 10 * np.log10(power + 1e-14)
    gain = from_db(np.clip(slope * (level_db - gate_db), -depth_db, 0))
    rounded = .7 * np.tanh(dry * gain / .7)
    return signal.sosfilt(signal.ellip(12, .1, 80, CUTOFF_HZ, fs=SR, output="sos"), rounded)


dry = scene()
out = record(dry)
unload_audio(out)
```